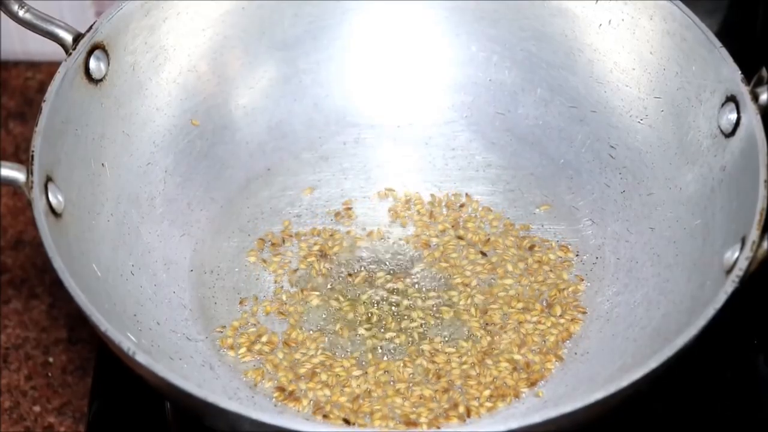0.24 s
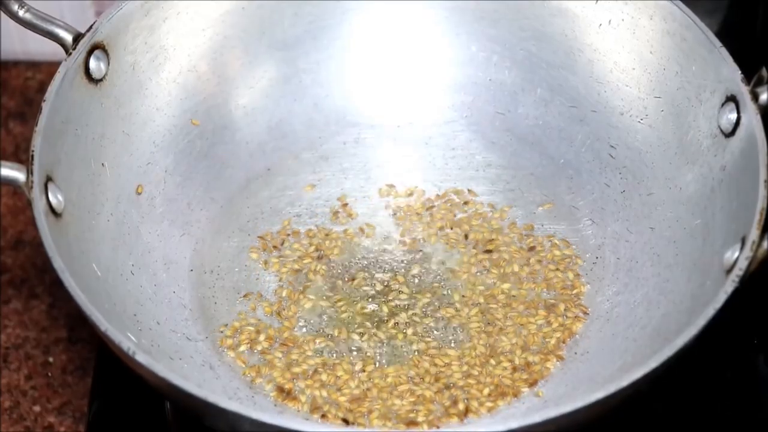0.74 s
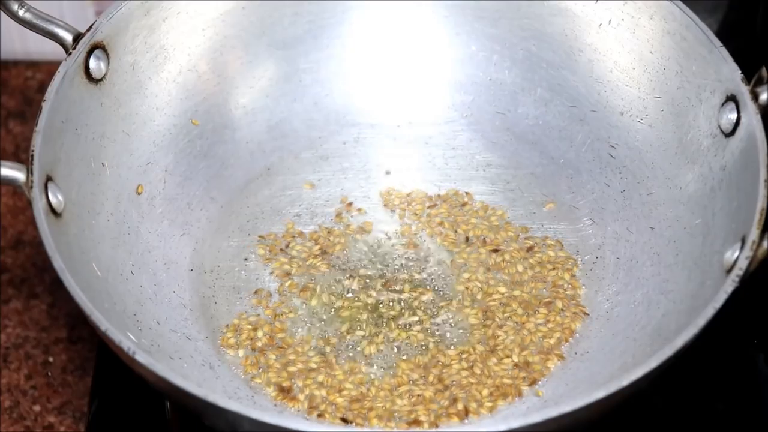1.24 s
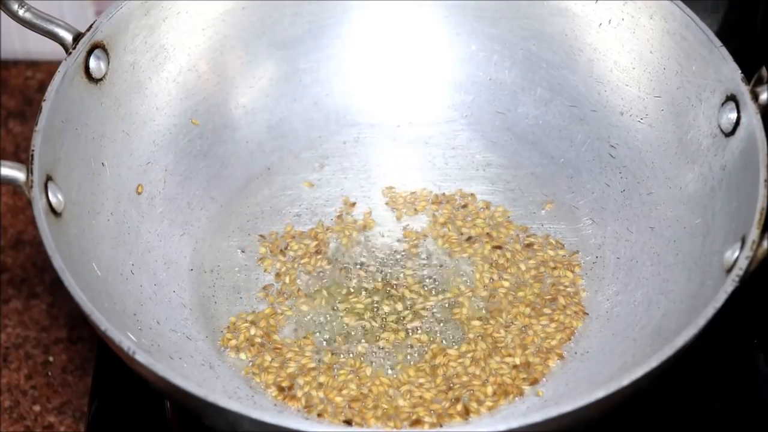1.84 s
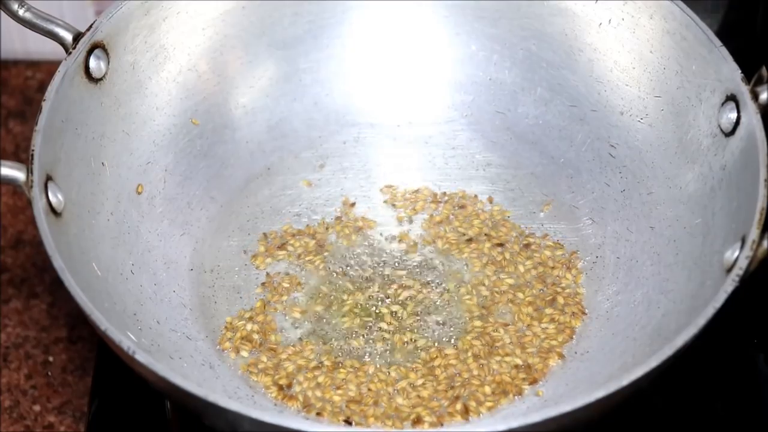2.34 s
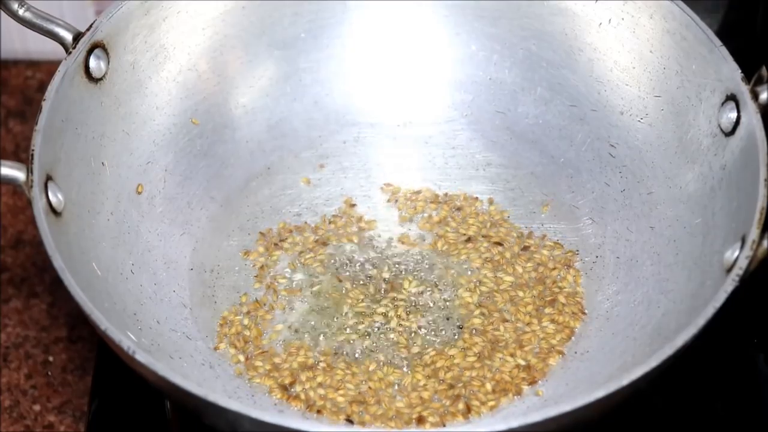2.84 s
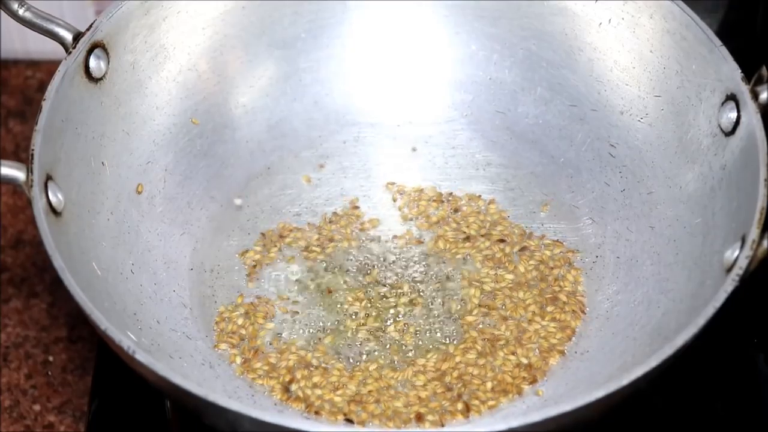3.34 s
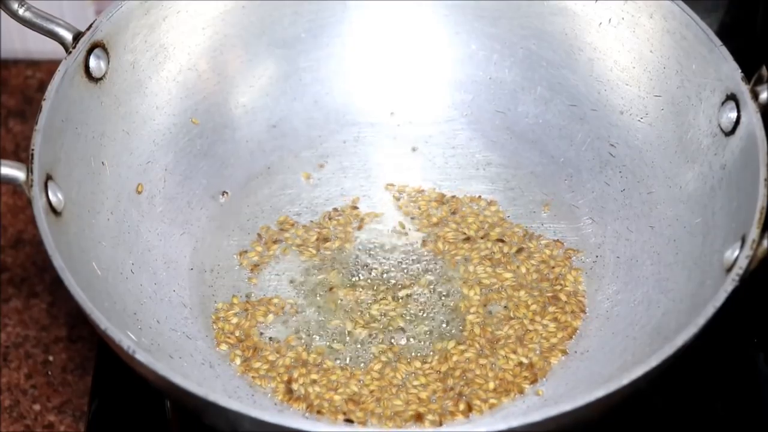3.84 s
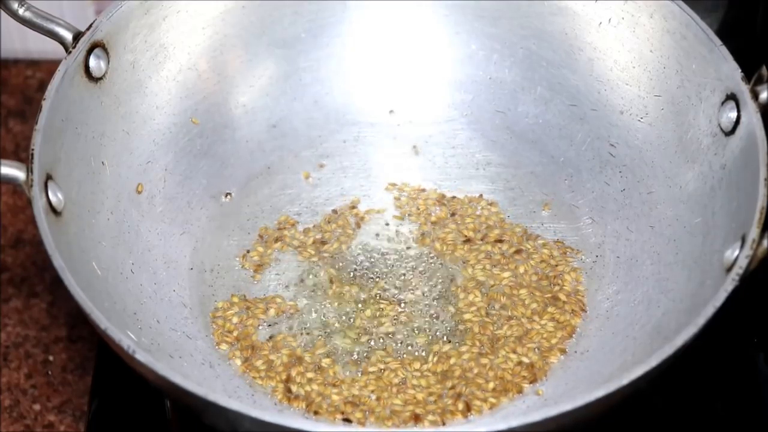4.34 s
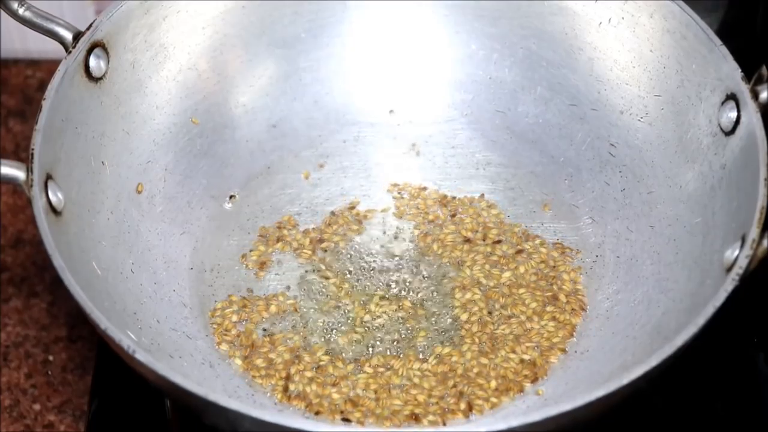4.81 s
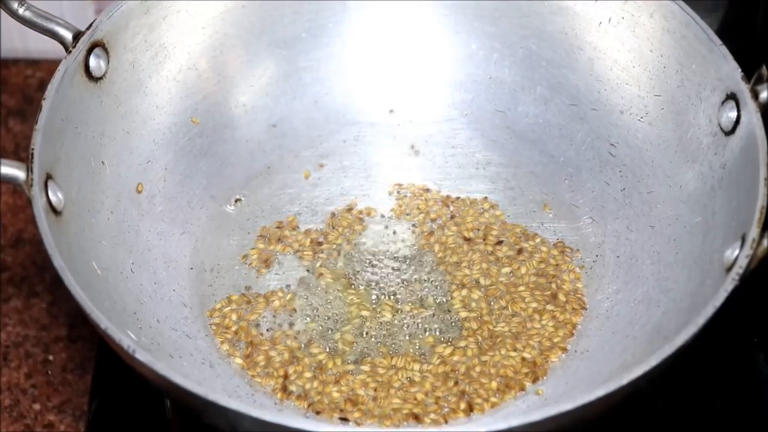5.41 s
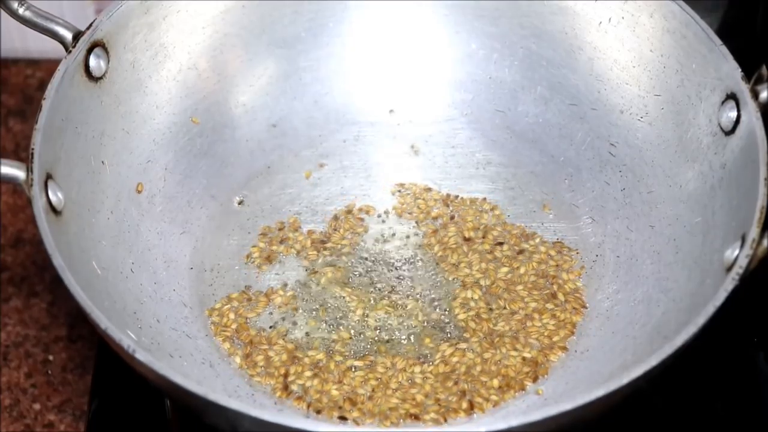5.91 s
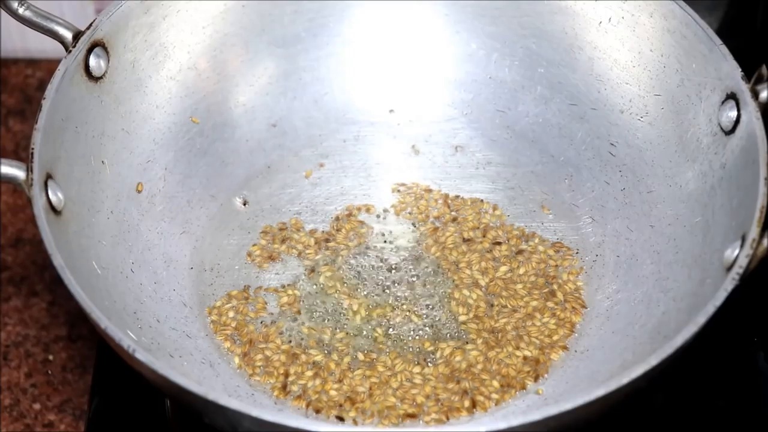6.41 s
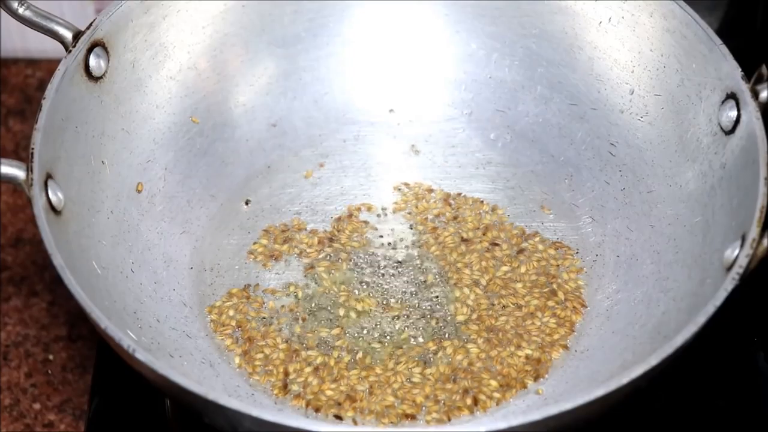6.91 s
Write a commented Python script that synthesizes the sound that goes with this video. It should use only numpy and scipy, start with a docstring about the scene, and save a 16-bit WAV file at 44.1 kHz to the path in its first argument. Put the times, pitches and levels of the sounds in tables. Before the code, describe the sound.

Small seeds fry in hot oil in an aluminium wok in a small hard-walled kitchen. Irregular sharp cracks and short hollow pops come many times a second, each stirring a burst of fine bubbly fizz above a soft hiss. The metal rings faintly. A hard airy thump hits the right side around 2.5 seconds. Close stereo microphone, low room background.

```python
"""Sharp crackles, fine fizz and a faint metallic ring: seeds fry in hot oil in an aluminium wok, in a small kitchen.
Each steam pocket bursts with a crack and a short cavity ring, which scatter in the bowl and drive the metal's modes.
Bursts lift a fizz of tiny bubbles, and many set off weaker pops; foam hisses steadily.
Puffs of air thump at the right microphone port, only weakly at the left; walls, kitchen noise and dull swells lie behind.
"""
import sys
import numpy as np
from scipy import signal
from scipy.fft import rfft, irfft, next_fast_len
from scipy.io import wavfile

SR = 44100
rng = np.random.default_rng(int(sys.argv[2]) if len(sys.argv) > 2 else 0)


def wav_record(signal):
    """Record a signal, one row per channel, as 16-bit PCM in the file named by sys.argv[1]."""
    frames = np.transpose(np.atleast_2d(signal))
    bounded = np.clip(frames, -1, 1)
    # unit amplitude maps onto the largest positive 16-bit level
    quanta = np.round(bounded * 32767).astype(np.int16)
    wavfile.write(sys.argv[1], SR, quanta)


N = 315964
POP_SAMPLES = 2048

# louder steam-pocket bursts: t/s, nominal level/dB, cavity f/Hz, nominal snap/dB (crack over cavity ring)
POPS = [(0.0154, -24.0, 3470, 2.5), (0.1, -21.5, 3260, -6.5), (0.1951, -25, 5250, 8),
        (0.202, -27.5, 2540, -1), (0.292, -25, 3130, -2.5), (0.334, -22.5, 3850, 0),
        (0.3558, -24.5, 2460, -1.5), (0.398, -27, 5700, 1), (0.431, -28, 3170, -6),
        (0.4971, -26.5, 3860, -2.5), (0.5382, -25, 4160, -5), (0.5851, -12, 3630, 10),
        (0.779, -26, 2390, -10), (0.8198, -28.5, 4800, -2), (0.8616, -19, 3180, 9.5),
        (0.8786, -23.5, 2900, -7), (0.8963, -28.5, 5300, 3), (0.928, -34, 5400, 5),
        (0.9675, -28.5, 5500, 3), (0.9935, -25.5, 3710, -1), (1.0047, -25.5, 2630, -5),
        (1.0354, -20.5, 3460, -1), (1.1259, -21, 3040, 6), (1.1786, -25, 3080, -1), (1.2637, -23, 2700, -7),
        (1.2778, -21.5, 3540, -3), (1.2799, -16, 2400, -2), (1.313, -27.5, 5200, 4), (1.34, -23.5, 5940, 5),
        (1.3498, -29, 2500, -3), (1.353, -20, 3020, -6.5), (1.3703, -35, 4600, 0), (1.379, -27, 3000, -12),
        (1.3943, -31, 4500, 8), (1.408, -24.5, 3710, 1), (1.4215, -20, 3150, -1.5), (1.48, -19.5, 5470, 14),
        (1.562, -27.5, 2160, -6), (1.577, -23.5, 3800, 0), (1.601, -27.5, 5200, -16),
        (1.6361, -18.0, 3330, -1.5), (1.692, -23, 4270, -2), (1.7047, -30, 3400, 5), (1.766, -27, 3720, -7),
        (1.7835, -25, 5500, 1), (1.85, -29.5, 3680, -6), (1.9367, -15.5, 2300, -4.5),
        (1.971, -15.5, 4940, 10.5), (2.0362, -21.5, 2920, -1), (2.0718, -27.0, 3960, 4),
        (2.1212, -34.5, 4110, 3), (2.2346, -29, 2840, 6), (2.3434, -20, 2870, 1), (2.447, -21.5, 3630, -8),
        (2.4792, -17, 2000, 12), (2.5258, -26.5, 5000, -2), (2.5463, -26.0, 2840, 3),
        (2.564, -20.5, 2100, -6), (2.6027, -14, 3000, 5), (2.622, -28, 4100, -2), (2.6447, -21, 3600, 7.5),
        (2.6833, -23, 4800, 8), (2.69, -25.5, 2960, 11), (2.7549, -27.5, 2260, -12), (2.785, -19, 2560, -6),
        (2.843, -22, 2900, -3.5), (2.8459, -23.5, 2750, -13), (2.8927, -25, 2560, -3),
        (2.898, -29, 6400, 0), (2.9064, -20.5, 3860, 0), (2.9263, -24, 5590, -2), (2.9695, -19, 2890, -5),
        (2.9783, -22, 2190, 1), (2.9962, -18.5, 2660, -5), (3.0422, -20, 3040, 5), (3.0944, -24, 2960, 5),
        (3.167, -24.5, 5400, 3), (3.1947, -28.0, 4550, 1), (3.2105, -25, 2500, -1.5),
        (3.2244, -25, 5440, 1), (3.2607, -27.5, 2400, -3), (3.3083, -19.5, 3020, -1.5),
        (3.3709, -16, 4470, 3), (3.4045, -24, 3160, -5), (3.4244, -25.5, 3410, -9),
        (3.4386, -26, 2920, -14), (3.4728, -21, 4360, 3), (3.492, -20, 3080, -3), (3.5085, -20, 2300, -6),
        (3.5569, -24, 3150, 13), (3.5735, -21, 3780, 1), (3.5998, -15.5, 3080, 2), (3.604, -20.5, 3530, -2),
        (3.6486, -19.5, 3430, -0.5), (3.7293, -20, 3050, 4), (3.7487, -18, 2210, -8),
        (3.758, -24.5, 3660, 13), (3.7652, -18.5, 7060, 4.5), (3.7733, -22.5, 3120, -5),
        (3.7873, -18, 3210, -7), (3.8141, -23, 3200, -4), (3.829, -21, 2310, -7), (3.8653, -24, 2900, -12),
        (3.8759, -22.5, 2580, -18), (3.9587, -22.0, 4740, 10), (3.9616, -20.5, 2700, -3),
        (3.9741, -22, 3530, 0), (4.0275, -30.0, 2950, -1), (4.0696, -29.0, 3380, -4),
        (4.0888, -31, 2270, -9), (4.1159, -28, 3330, 6), (4.12, -20, 3160, -3.5), (4.165, -17, 2380, -1.5),
        (4.1963, -17, 2520, -6), (4.2596, -22.0, 2350, -1.5), (4.2781, -23.5, 2700, -4),
        (4.2937, -19, 2560, -1), (4.3044, -24, 2360, 8), (4.3408, -21.5, 3860, -1.5),
        (4.3944, -27, 6060, 2), (4.4183, -26.5, 2520, -12), (4.4266, -19, 3250, -7),
        (4.4583, -20.5, 3100, -5), (4.4654, -16.0, 5070, 2), (4.5034, -28, 5500, -7),
        (4.5348, -21.5, 3550, -1), (4.5902, -22.5, 3170, -5), (4.6177, -19, 3150, 6),
        (4.6466, -24.5, 3280, -4), (4.6617, -25, 2830, -6), (4.68, -21.5, 2420, -2), (4.697, -31, 2860, -1),
        (4.7915, -27.5, 2930, -11), (4.8245, -23.5, 3220, -6), (4.9268, -26, 2470, -5.5),
        (5.018, -20.0, 6340, 10.5), (5.052, -26.5, 2330, -11), (5.0836, -23, 3170, -2),
        (5.14, -31, 5430, -12), (5.1513, -16.5, 2780, -4), (5.1715, -27, 3150, 12), (5.229, -21, 2750, -6),
        (5.2442, -21, 4840, 4), (5.2582, -17.5, 6140, 6), (5.2992, -15.5, 3160, -5),
        (5.3409, -26, 2510, -4), (5.3529, -22, 3210, -0.5), (5.3811, -30.5, 3600, -8),
        (5.4042, -27.5, 2930, -10), (5.4327, -24.5, 3320, 11), (5.4737, -25.0, 3860, -7),
        (5.5525, -24.5, 4140, -1), (5.562, -18.5, 2650, -0.5), (5.5788, -21, 2220, -8),
        (5.5995, -24, 2400, 14), (5.7092, -22.5, 3430, 0), (5.741, -27.5, 3350, -3), (5.825, -25, 3040, -9),
        (5.8278, -22, 4370, 2), (5.8434, -29, 2360, -12), (5.8532, -20.5, 3070, -5),
        (5.8684, -25.5, 5900, -7), (5.8847, -22.5, 2250, -1), (5.8999, -23.5, 3130, -2),
        (5.9207, -28, 4730, -3), (5.948, -24.5, 2100, -3), (5.9528, -20.5, 2980, -2.5),
        (6.005, -17.5, 2630, 0), (6.0788, -26.5, 5900, 0), (6.1186, -24, 3380, -4),
        (6.1254, -22, 2460, -17), (6.144, -17.5, 2470, -8.5), (6.2632, -26.5, 2600, -10),
        (6.3109, -30, 3860, -6), (6.3519, -25.5, 3200, -5), (6.422, -24.5, 5250, -4),
        (6.4459, -25.5, 2640, -3), (6.4602, -26, 2450, -2), (6.4713, -21, 3150, -5),
        (6.4858, -18.5, 3800, -3.5), (6.505, -19.5, 2060, -4), (6.53, -20.5, 2510, -7),
        (6.5528, -23.5, 2340, 0.5), (6.6315, -26.5, 2270, -6), (6.6625, -12.5, 4570, 11),
        (6.7187, -20.5, 2880, -6), (6.7938, -19, 2670, -11.5), (6.8689, -24, 2780, -7),
        (6.924, -21.0, 3020, -3.5), (6.9362, -27, 3000, -3), (6.9726, -29, 3400, 12),
        (7.0648, -30, 3150, 7), (7.0946, -20.5, 3070, -7)]
# spectrum of the bubbles and foam: f/Hz, level/dB
FIZZ_COLOUR = [(300, -10), (700, 0.5), (1400, -9.5), (2600, -11.5), (5500, -2.5), (9000, -7),
               (15000, -13.5)]


def undb(db):
    """Decibels to amplitude gain."""
    return 10 ** (np.asarray(db) / 20)


def unit(x):
    """Scale each row to unit energy."""
    return x / np.sqrt(np.sum(x ** 2, axis=-1, keepdims=True) + 1e-18)


def fade(t, t60_s):
    """Exponential decay, 60 dB in t60_s."""
    return np.exp(-np.log(1000) * t / t60_s)


def colour(x, points):
    """Zero-phase filter; (Hz, dB) points interpolated over log frequency."""
    hz, db = np.transpose(points)
    size = next_fast_len(x.shape[-1] + POP_SAMPLES)
    f = np.maximum(np.fft.rfftfreq(size, 1 / SR), 1)
    gain = undb(np.interp(np.log(f), np.log(hz), db))
    return irfft(rfft(x, size) * gain, size)[..., :x.shape[-1]]


def add(out, start_s, sound):
    """Mix a sound in at start_s."""
    start = max(int(start_s * SR), 0)
    part = out[..., start:start + sound.shape[-1]]
    part += sound[..., :part.shape[-1]]


def ports(three, spread):
    """Two channels from one shared signal and one of their own each; spread is the own share of the power."""
    spread = np.clip(spread, 0, 1)
    shared, own = three[..., :1, :], three[..., 1:, :]
    return np.sqrt(1 - spread) * shared + np.sqrt(spread) * own


def bowl(count, near_db=-0.5, far_db=1.0, near_s=0.0019, far_t60_s=0.074, near_spread=0.21, far_spread=0.29):
    """Paths from burst to ports: direct, early focus by the curved wall, then decaying scatter round the bowl."""
    t = np.arange(POP_SAMPLES) / SR
    noise = rng.standard_normal((count, 2, 3, POP_SAMPLES))
    # cubing makes the early paths sparse
    wall = noise[:, 0] ** 3 * (t > .0002) / (1 + (t / near_s) ** 8)
    scatter = noise[:, 1] * fade(t, far_t60_s) * np.minimum(t / near_s, 1) ** 2
    direct = t == 0
    near = undb(near_db) * ports(unit(wall), near_spread)
    far = undb(far_db) * ports(unit(scatter), far_spread)
    return direct + near + far


def pops(rows, crack_q=0.76, cavity_q=4.6, cut_hz=1300, ring_db=0.5, crack_db=0.76):
    """Each burst is a broad crack plus the few cycles its open cavity rings; snap shares the energy between them."""
    start_s, level_db, cavity_hz, snap_db = np.transpose(rows)[:, :, None, None]
    # a snappier burst cracks higher: 0.0472 octaves per dB
    crack_hz = 5930 * 2 ** (0.0472 * snap_db)
    jf = 1j * np.fft.rfftfreq(POP_SAMPLES, 1 / SR)
    low, cavity, snap = jf / cut_hz, jf / cavity_hz, jf / crack_hz

    # so small a source radiates little bass
    bass_cut = low ** 2 / (1 + np.sqrt(2) * low + low ** 2)
    resonance = bass_cut / (1 + cavity / cavity_q + cavity ** 2)
    ring_paths = bowl(len(rows), near_db=5.5, far_db=2.5)
    ring = unit(irfft(resonance * rfft(ring_paths)))

    # short waves of the crack find their own paths
    crack_band = (snap / (1 + snap / crack_q + snap ** 2)) ** 2
    crack_paths = bowl(len(rows), near_db=7.1, far_db=2.0, near_s=0.0029, near_spread=0.48)
    crack = unit(irfft(crack_band * rfft(crack_paths)))

    bursts = undb(ring_db) * ring + undb(crack_db + snap_db) * crack
    bursts *= undb(level_db) / np.hypot(1, undb(snap_db))
    burst_samples = .004 * SR  # span to which the nominal level refers
    out = np.zeros((2, N))
    for onset_s, burst in zip(start_s.ravel(), bursts):
        add(out, onset_s, burst * np.sqrt(burst_samples))
    return out


def sputter(count=105, wait_s=0.023, level_db=-34, level_scatter_db=2.0,
            cavity_hz=3390, scatter_octaves=0.36, snap_db=-2.5, snap_scatter_db=6):
    """Rows as in POPS: weak pockets set off by evenly picked louder ones, each after a random wait of mean wait_s."""
    parent = np.linspace(0, len(POPS) - 1, count).astype(int)
    size, pitch, snap = np.clip(rng.standard_normal((count, 3)), -2, 2).T
    start_s = np.array(POPS)[parent, 0] + wait_s * rng.exponential(size=count)
    return np.column_stack([start_s,
                            level_db + level_scatter_db * size,
                            cavity_hz * 2 ** (scatter_octaves * pitch),
                            snap_db + snap_scatter_db * snap])


def fizz(per_second=380, cavity_q=3.9, count=12, size_db=6.2):
    """Tiny bubbles burst at random at a dozen spots in the oil, each spot with its own cavity pitch."""
    out = np.zeros((2, N))
    jf = 1j * np.fft.rfftfreq(POP_SAMPLES, 1 / SR)
    for hz, paths in zip(np.geomspace(1800, 11000, count), bowl(count)):
        chance, size = rng.random(N), np.minimum(rng.exponential(size=N), 3.5)
        clicks = (chance < per_second / count / SR) * undb(size_db * size)
        cavity = jf / hz
        resonance = cavity / (1 + cavity / cavity_q + cavity ** 2)
        tick = unit(irfft(rfft(paths) * resonance))
        out += signal.oaconvolve(clicks[None], tick, axes=-1)[:, :N]
    return unit(colour(out, FIZZ_COLOUR)) * np.sqrt(N) * boil()


def boil(simmer_db=-46.5, stirred_db=-42, settle_s=0.022):
    """Fizz strength: steady simmer, lifted by each louder burst in step with its size, settling exponentially."""
    start_s, level_db = np.transpose(POPS)[:2]
    kicks = np.bincount((start_s * SR).astype(int), undb(level_db), N)[:N]
    stir = signal.lfilter([1], [1, -np.exp(-1 / (settle_s * SR))], kicks)
    return np.hypot(undb(simmer_db), undb(stirred_db) * np.sqrt(stir / stir.mean()))


def foam(foam_db=-64.0, spread=0.13, per_second=5000):
    """The finest foam round the seeds bursts so densely that it merges into a steady hiss."""
    clicks = (rng.random((3, N)) < per_second / SR) * rng.standard_normal((3, N))
    return unit(colour(ports(clicks, spread), FIZZ_COLOUR)) * np.sqrt(N) * undb(foam_db)


def wok(dry, wok_db=-21.0, phase_spread_rad=0.31, spot_s=.02):
    """Metal rings faintly, damped by oil and seeds; the drive of each mode wanders as the spots in the pan change."""
    # modes of the metal: f/Hz, relative level/dB, t60/s
    modes = [(669.2, -1.5, 0.23), (770, -22, 0.068), (848, -6, 0.13), (913, -9, 0.21), (1021, -3, 0.31),
             (1175.4, 4.5, 0.18), (1683, -10, 0.31), (1756, -3.5, 0.047), (2020, -6.5, 0.35),
             (2550, -12, 0.27), (2550, -29, 0.48), (3006, 2.5, 0.029), (3240, -17, 0.16),
             (3956, 0.5, 0.074), (5500, -3, 0.027)]
    drive, t, out = dry.mean(axis=0), np.arange(N) / SR, np.zeros((2, N))
    moments_s = np.arange(0, N / SR, spot_s)
    for hz, db, t60_s in modes:
        coupling = np.interp(t, moments_s, rng.standard_normal(len(moments_s)))
        pole = fade(1 / SR, t60_s) * np.exp(2j * np.pi * hz / SR)
        gain = np.sqrt(2 * (1 - abs(pole) ** 2))
        ring = signal.lfilter([gain], [1, -pole], drive * coupling)
        # each mode meets the two ports in slightly different phase
        phase_rad = phase_spread_rad * rng.standard_normal((2, 1))
        out += undb(db) * np.imag(ring * np.exp(1j * phase_rad))
    return undb(wok_db) * out


def puffs(push_s=0.00024, front=.5, port_hz=76, left_db=-21, eddy_db=-16, eddy_hz=110, eddy_t60_s=0.084):
    """Steep-fronted push of air, then weak eddies; the port's bass cut makes it swing back."""
    # puffs that reach the microphone: t/s, nominal peak level/dB
    arrivals = [(0.5855, -20), (0.862, -32), (1.482, -34), (1.972, -27), (2.4798, 1), (2.6021, -29.5),
                (6.664, -14.5)]
    t = np.arange(SR // 4) / SR
    push = (front + np.e * t / push_s) * np.exp(-t / push_s) / (1 + front / 2)
    eddy_lowpass = signal.butter(2, eddy_hz, fs=SR, output="sos")
    swirl = signal.sosfilt(eddy_lowpass, rng.standard_normal((len(arrivals), len(t))))
    eddies = undb(eddy_db) * np.linalg.norm(push) * unit(swirl * fade(t, eddy_t60_s))
    air = np.zeros(N)
    for (start_s, db), eddy in zip(arrivals, eddies):
        add(air, start_s, undb(db) * (push + eddy))
    thumps = signal.sosfilt(signal.butter(2, port_hz, "high", fs=SR, output="sos"), air)
    return np.array([undb(left_db) * thumps, thumps])


def room(dry, room_db=-8.5, t60_s=0.22, treble_t60_s=0.34, split_hz=6000, build_s=0.019, spread=0.99):
    """Hard kitchen walls answer with a diffuse tail that builds over build_s; its treble dies more slowly."""
    # tail spectrum: f/Hz, relative level/dB
    tail_colour = [(100, 3), (400, 7.5), (800, -1), (2500, 3), (6000, -4.5), (10000, -5), (15000, -4.5)]
    t = np.arange(SR // 2) / SR
    noise = ports(rng.standard_normal((3, len(t))), spread)
    low = signal.sosfilt(signal.butter(2, split_hz, fs=SR, output="sos"), noise)
    high = signal.sosfilt(signal.butter(2, split_hz, "high", fs=SR, output="sos"), noise)
    decay = low * fade(t, t60_s) - high * fade(t, treble_t60_s)
    tail = unit(decay * np.minimum(t / build_s, 1) ** 2)
    return undb(room_db) * signal.oaconvolve(dry, colour(tail, tail_colour), axes=-1)[:, :N]


def kitchen(level_db=-53, spread=0.34):
    """Low, even background of the room: filtered noise."""
    # noise spectrum: f/Hz, relative level/dB
    noise_colour = [(20, -18), (45, -6.5), (90, -1), (160, -2), (260, 0.5), (500, -2), (1000, -28),
                    (4000, -2), (15000, -4)]
    noise = colour(ports(rng.standard_normal((3, N)), spread), noise_colour)
    return unit(noise) * np.sqrt(N) * undb(level_db)


def swells(count=24):
    """Dull rumbles and a soft hum rise and fall under the frying: sine clusters in half-sine envelopes."""
    # low swells: centre t/s, length/s, centre f/Hz, width/Hz, level/dB
    bands = [(.55, 0.028, 285, 210, -54), (1.04, 0.16, 259.4, 147, -58), (5.14, 0.051, 253, 200, -56),
             (6.38, 0.215, 510, 5.1, -62), (6.42, 0.24, 247, 12, -69)]
    out = np.zeros(N)
    for centre_s, length_s, hz, width_hz, db in bands:
        t = np.arange(int(length_s * SR)) / SR
        offset, phase_cycles = rng.random((2, count, 1))
        sine_hz = hz + width_hz * (offset - .5)
        band = np.sin(2 * np.pi * (sine_hz * t + phase_cycles)).sum(axis=0)
        swell = unit(band * np.sin(np.pi * t / length_s)) * np.sqrt(len(t))
        add(out, centre_s - length_s / 2, undb(db) * swell)
    return out


def scene():
    """Pops, sputter, fizz and foam in the wok, the room around them, puffs at the ports, background."""
    # bands the bowl favours: f/Hz, gain/dB
    bowl_colour = [(300, 2), (500, -3.5), (720, 4), (1000, -3.5), (1350, -3), (1680, 3.5), (1980, -5.5),
                   (2400, 2), (3100, 1.5), (4400, 0.5), (7000, 1), (11000, -3), (15000, 0.5)]
    bursts = colour(pops(POPS) + pops(sputter()), bowl_colour)
    oil = bursts + fizz() + foam()
    pan = oil + wok(oil)
    return pan + room(pan) + puffs() + kitchen() + swells()


def record(dry, top_hz=16000):
    """Ports differ in treble and phase; peaks clip at full scale, then a steep lowpass cuts the top."""
    # phase by which the left port leads: f/Hz, phase/rad
    port_phase = [(0, -0.21), (850, -0.31), (1200, -0.82), (1800, 0.42), (2250, 0.49), (4000, 0.47),
                  (8000, 0.86), (11000, 0.78), (13000, 1.45), (16000, 1.8)]
    # treble balance: f/Hz, right minus left level/dB
    port_tilt = [(100, -1), (4000, 0.5), (8500, 0.1), (10500, -0.5), (13000, 6), (16000, 0)]
    lead_rad = np.interp(np.fft.rfftfreq(N, 1 / SR), *np.transpose(port_phase))
    shifted = irfft(rfft(dry[0]) * np.exp(1j * lead_rad), N)
    left = colour(shifted, [(hz, -db / 2) for hz, db in port_tilt])
    right = colour(dry[1], [(hz, db / 2) for hz, db in port_tilt])
    steep = signal.ellip(10, .1, 80, top_hz, fs=SR, output="sos")
    return signal.sosfilt(steep, np.clip([left, right], -1, 1))


dry = scene()
out = record(dry)
wav_record(out)
```